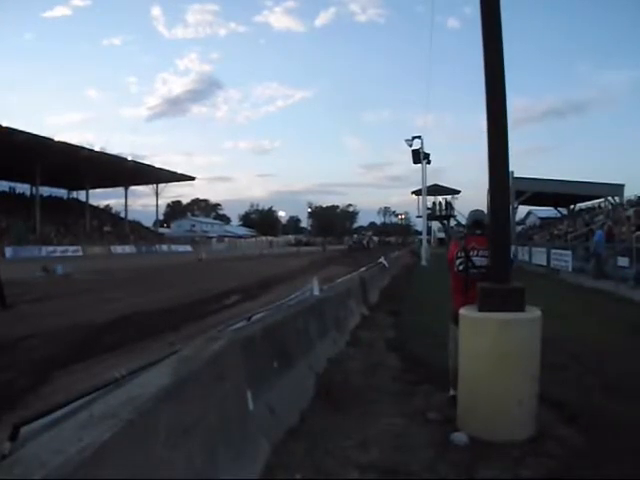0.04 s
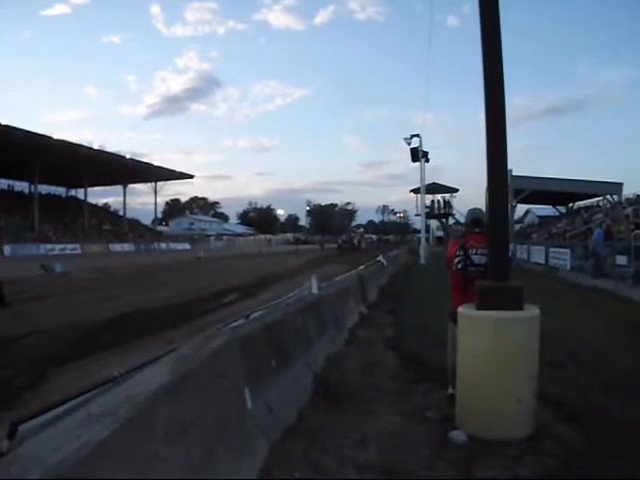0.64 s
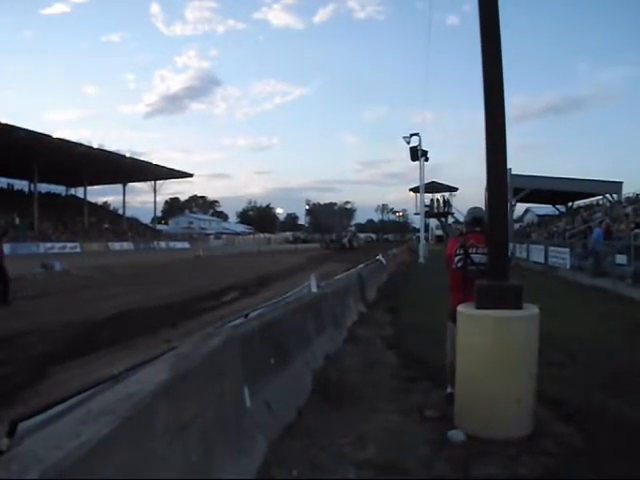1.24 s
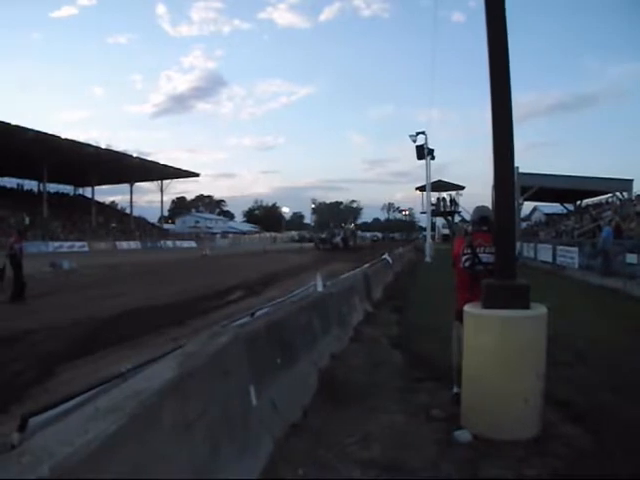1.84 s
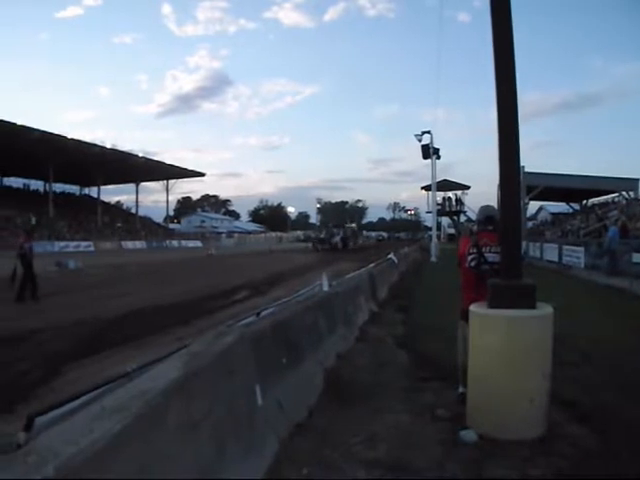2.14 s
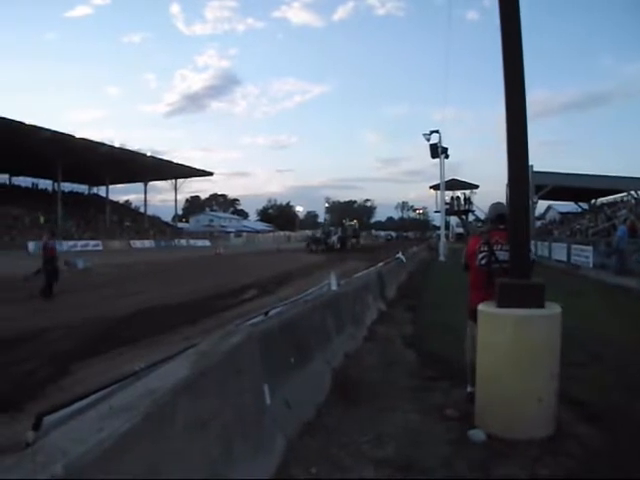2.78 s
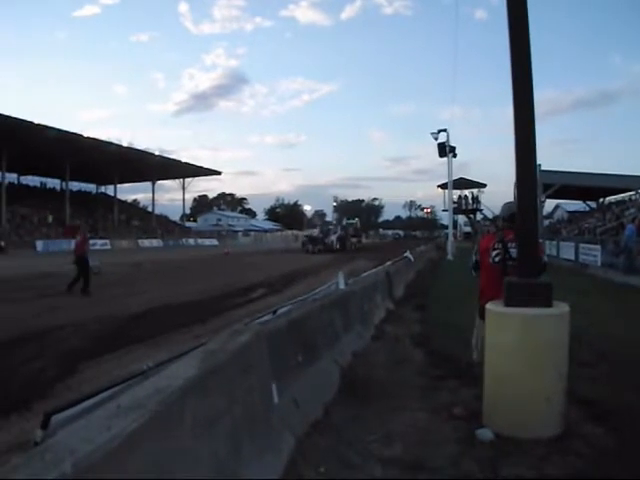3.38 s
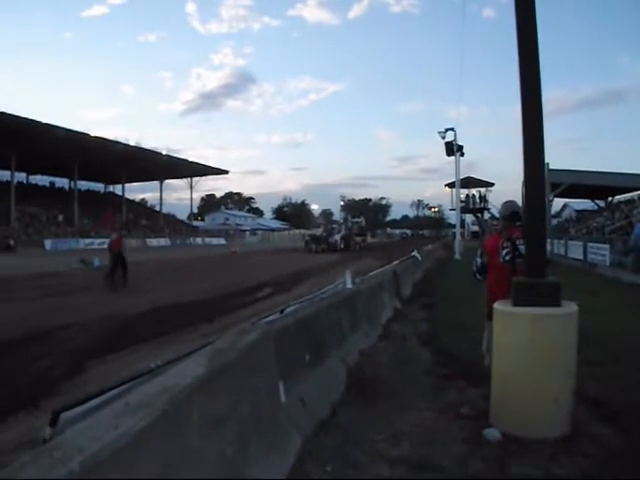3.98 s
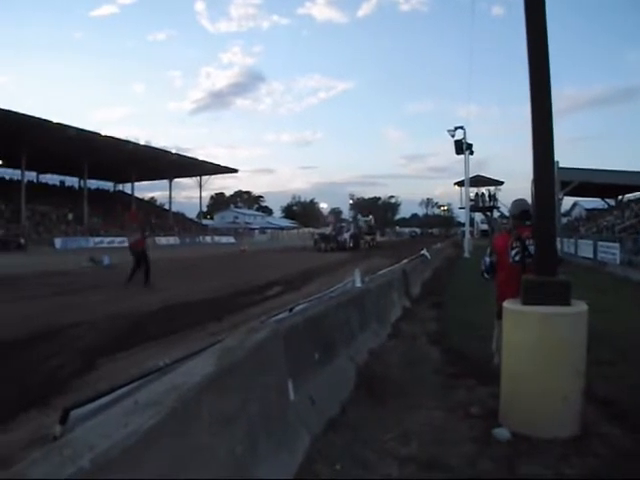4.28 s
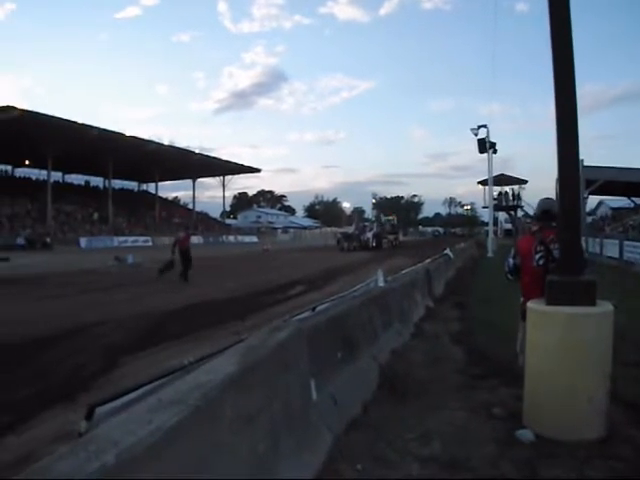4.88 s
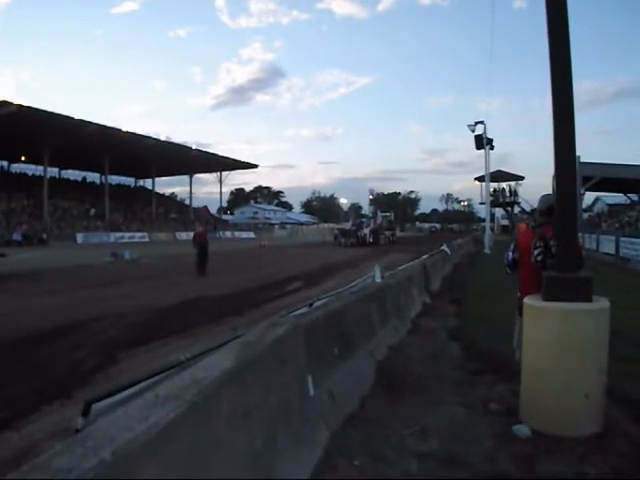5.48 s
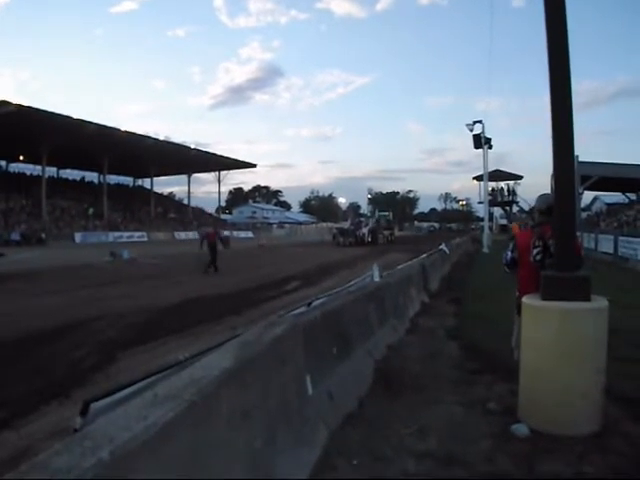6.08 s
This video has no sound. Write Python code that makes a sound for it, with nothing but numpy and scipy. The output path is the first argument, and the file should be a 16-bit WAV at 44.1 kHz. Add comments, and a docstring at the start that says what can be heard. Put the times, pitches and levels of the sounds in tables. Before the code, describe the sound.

Two quick exhaust blasts lead into the tearing, full-throttle roar of a multi-engine pulling tractor, overloading a small trackside microphone. After about a second and a half the throttle shuts and the revs sink. The engines settle into a lumpy, rasping idle with booming thuds and barks, while two brief falling whines and a few backfire pops come through. A grandstand returns a faint echo.

```python
"""Two blasts of exhaust, then the full-throttle roar of a pulling tractor's open-piped V8 engines,
heard from trackside on a small camera microphone that overloads. The throttle shuts, the blowers
whine down and three engines fall to a lumpy, barking idle, each firing a thud and a rasp in its pipe.
Unburnt fuel pops a few times. A wall returns the thuds; the grandstand answers from across the track."""
import sys
import numpy as np
from scipy import signal
from scipy.fft import rfft, irfft
from scipy.io import wavfile
from scipy.ndimage import uniform_filter1d, map_coordinates

SR = 44100
rng = np.random.default_rng(int(sys.argv[2]) if len(sys.argv) > 2 else 0)


def output_pcm(signal):
    """Save a mono or channel-first signal as 16-bit PCM at the path in sys.argv[1].

    Samples are clipped to [-1, 1] before scaling.
    """
    pcm = np.clip(np.atleast_2d(signal).T, -1, 1) * 32767
    wavfile.write(sys.argv[1], SR, np.round(pcm).astype(np.int16))


N = 274743
TIME = np.arange(N) / SR
SHUT_S, RELEASE_S = 1.405, 0.13  # the throttle shuts; time constant of the roar's decay

# spectrum of the gas puffing from a pipe: frequency_hz, relative_db
RASP_SPECTRUM = [(150, -2.5), (330, -9), (490, -6.5), (630, -8), (840, -8), (1010, -15.5), (1800, -19),
                 (2330, -13), (2600, -3), (3020, 1), (3450, -5.5), (3900, -5.5), (4400, -13), (5100, -24),
                 (5550, -64), (7000, -120)]
# resonances of a pipe struck by one firing: frequency_hz, relative_db
PIPE_SPECTRUM = [(18, -34), (42, -7), (55, 8), (70, -1), (88, 9), (108, -2), (135, -2), (150, 2.5),
                 (190, 2), (243, -5), (285, -19.5), (490, -16.5), (800, -22), (2000, -61), (6000, -120)]


def full_throttle(cycle_hz):
    """Exhaust orders sound under a tearing roar that pulses with the firings and buffets the microphone."""
    # blasts of exhaust: start_s, end_s, roar_rise_db
    blasts = [(0.017, 0.071, 7), (0.096, .146, 10.5)]
    # surges and lulls: peak_s, half_length_s, roar_rise_db, third_order_rise_db, buffet_rise_db
    surges = [(.048, 0.035, 3.5, 20.5, 19.5), (.085, 0.0092, -3, -12, -3), (.17, 0.025, 1.5, 7.5, 10),
              (.33, 0.052, 1.6, 14.5, 16), (.49, 0.063, 2, 8.5, 21), (.567, 0.0027, 4, 8, 7),
              (.696, .004, 3.5, 1, 10), (.78, .08, 1, 3, 12), (1.04, 0.13, 1.54, 7, 15.5),
              (1.27, 0.084, 2, 0, 15), (1.41, 0.065, 2.7, 15, 15)]
    # the booming fifth exhaust order: time_s, relative_db
    fifth_order = [(0, -12.5), (.1, -24), (.22, -17.5), (.52, -11), (.66, -28), (.8, -15), (1.21, -15),
                   (1.3, -40), (1.41, -13.5)]
    # upper exhaust orders: multiple_of_cycle_rate, relative_db
    upper_orders = [(6, -32.5), (7, -27.5), (8, -16.5), (11, -24), (13, -19), (15, -20.5), (16, -18),
                    (17, -40), (19, -32), (24, -27.5)]
    # the exhaust jet under load: frequency_hz, relative_db
    roar_spectrum = [(30, -15.5), (130, -9.5), (350, -12.5), (540, -10.5), (800, -15.5), (1300, -15.5),
                     (1950, -12.5), (2500, -5), (3000, 0.5), (3350, -1), (3650, -5), (4150, -8),
                     (4900, -19.5), (5600, -55)]
    # buffeting at the microphone: frequency_hz, relative_db
    buffet_spectrum = [(8, -5.5), (20, 3), (40, 6), (70, 4), (130, -19.5), (400, -49.5), (1500, -100)]
    roar_db, third_db, buffet_db = swells(surges) + [[-9.5], [-27.5], [-36.5]]  # over their base levels
    fifth_db = curve(fifth_order)
    blast_db = sum(db * ((TIME > start) & (TIME < end)) for start, end, db in blasts)
    phase = 2 * np.pi * np.cumsum(cycle_hz) / SR

    def order(multiple, jitter):
        return np.sqrt(2) * np.sin(multiple * phase + 2 * np.pi * rng.random() + jitter * wobble(12))

    low = amp(third_db) * order(3, jitter=0.9) + amp(fifth_db) * order(5, jitter=0.067)
    # the engines drift in and out of step, so each order swells and fades
    upper = sum(amp(db) * (1 + 0.62 * wobble(5.34)) * order(k, jitter=0.71) for k, db in upper_orders)
    tones = amp(0.51 * blast_db) * (low + amp(roar_db) * upper)
    pulses = firings(cycle_hz, drift=0.0014, scatter_db=4.0, far_bank=.6)
    gas = unit(puffs(pulses, life_s=0.0023)) + 0.96
    roar = amp(roar_db + blast_db + 1.64) * steady(hiss(roar_spectrum, gas), span_s=0.016)
    buffet = amp(buffet_db + blast_db) * hiss(buffet_spectrum)
    # orders and buffeting stop first when the throttle shuts
    return dying(SHUT_S, RELEASE_S) * roar + dying(SHUT_S, life_s=0.08) * (tones + buffet)


def firings(cycle_hz, drift, scatter_db, far_bank):
    """One V8 fires eight pulses a cycle, weaker from the bank facing away from the microphone."""
    # firing order: 1 for the near bank, 0 for the far bank
    banks = [1, 0, 1, 1, 0, 1, 0, 0]
    cycles = np.cumsum(cycle_hz * (1 + drift * wobble(6))) / SR + rng.random()
    slot = np.floor(8 * cycles).astype(int)
    onsets = np.flatnonzero(np.diff(slot)) + 1
    strength = np.where(np.take(banks, slot[onsets], mode="wrap"), 1, far_bank)
    scatter = amp(scatter_db * rng.standard_normal(4096)[:len(onsets)].clip(-2, 2))
    return np.bincount(onsets, strength * scatter, N)


def idle(cycle_hz):
    """The engines lope out of step; every uneven firing is a thud in its pipe and a rasping puff."""
    # idling engines: speed_ratio, relative_db, pipe_tuning_ratio
    engines = [(1, -0.5, 1.031), (1.05, -2, 1.034), (.955, -4, 0.937)]
    # flares of harder firing: peak_s, thud_rise_db, rasp_rise_db
    flares = [(1.96, 1, 3), (2.42, -2.5, 2.5), (2.6, 3, 3), (2.77, 6.5, 1.5), (2.96, 4.5, 0.5),
              (3.42, 3.5, 5), (4.18, 7, 4), (4.58, 0, 1), (4.97, 1, 0.5), (5.12, 2.5, 2.5), (5.28, 0, 2.5),
              (5.77, 0, 1), (5.938, 1.5, 2), (6.12, 4, 0.5)]
    catch_s, catch_rise_s = 1.78, .04  # the starved engines catch again
    flare_half_s, rasp_rise_db_per_s = 0.038, 0.3
    wall_delay_s, wall_gain = .0265, 0.45
    starved = 1 - np.clip((TIME - catch_s) / catch_rise_s, 0, 1)
    flare_thud_db, flare_rasp_db = swells([(s, flare_half_s, *rises) for s, *rises in flares])
    thud_db = -20 - 10 * starved + flare_thud_db + 1.27 * wobble(13)
    settling_db = rasp_rise_db_per_s * (TIME - catch_s)  # the rasp hardens as the idle settles
    rasp_db = -18.5 + settling_db - 1.5 * starved + flare_rasp_db + 0.6 * wobble(8.3)
    thud, all_pulses = 0, 0
    for speed_ratio, db, tuning in engines:
        strength = amp(db + 1.05 * wobble(6))
        pulses = strength * firings(cycle_hz * speed_ratio, drift=.055, scatter_db=3.5, far_bank=0.21)
        pipe = [(hz * tuning, level) for hz, level in PIPE_SPECTRUM]
        mean_flow = uniform_filter1d(pulses, size=4410)
        thud = thud + coloured(mean_flow - pulses, pipe)
        all_pulses = all_pulses + pulses
    wall_echo = wall_gain * np.interp(TIME - wall_delay_s, TIME, thud)
    thud = steady(thud + wall_echo, span_s=0.0615)
    gas = unit(puffs(all_pulses, life_s=0.0047)) + 0.51
    rasp = steady(hiss(RASP_SPECTRUM, gas), span_s=0.1)
    return (1 - dying(SHUT_S, RELEASE_S)) * (amp(thud_db) * thud + amp(rasp_db) * rasp)


def chugs():
    """A few strong firings in a row make a pipe boom at its own pitch, swelling and fading quickly."""
    # booms of a pipe: start_s, length_s, level_db, pitch_hz
    booms = [(1.6, 0.085, -22.5, 101), (1.808, 0.058, -15, 104.2), (1.882, 0.072, -20, 98.2),
             (1.96, 0.05, -18.5, 129), (2.407, 0.044, -13.5, 108.9), (2.48, 0.031, -23, 111.6),
             (2.726, 0.041, -15.5, 119), (2.939, 0.048, -18, 112.1), (3.017, 0.044, -16.5, 104),
             (3.183, 0.027, -16, 111), (3.47, 0.056, -19, 111.5), (3.61, 0.061, -14.5, 108.7),
             (3.777, 0.045, -17, 109.9), (3.913, 0.053, -16, 106.3), (4.216, 0.073, -16.5, 108),
             (4.534, 0.072, -19, 105.2), (5.533, 0.031, -20, 119.9), (5.621, 0.041, -17, 111),
             (5.901, 0.13, -18.5, 114.9)]
    tone = lambda hz: np.sqrt(2) * np.sin(2 * np.pi * (hz * TIME + rng.random()))
    return sum(amp(db) * bell(s + length / 2, 0.7 * length) * tone(hz) for s, length, db, hz in booms)


def barks():
    """Now and then a cylinder fires much harder: one thud and one puff of gas."""
    # hard single firings: start_s, relative_db
    hard_firings = [(1.9725, -4.5), (2.1389, -10.5), (2.3944, -12), (3.419, -15), (4.5486, -5),
                    (4.6849, -18), (4.752, -6.5), (4.9242, -5.5), (4.9927, -5.5), (5.1357, -8.5),
                    (5.3187, -8), (5.6537, -10), (5.734, -4.5)]
    start_s, db = np.transpose(hard_firings)
    pulses = np.bincount(np.round(start_s * SR).astype(int), amp(db), N)
    gas = puffs(pulses, life_s=.003)
    rasp = gas.std() * hiss(RASP_SPECTRUM, gas)
    return amp(-1.5) * rasp - amp(16.5) * coloured(pulses, PIPE_SPECTRUM)


def pops():
    """Unburnt fuel goes off in a pipe: one swing of air with a bang and a crack on its crest."""
    # pops in the pipes: peak_s, push_db, bang_db, crack_db, half_length_s
    backfires = [(2.43, -2.5, -3.5, -2, 0.0012), (2.526, -9, -35, -25, 0.00054),
                 (2.825, -24, -18, -11.5, 0.0011), (4.625, -6, -12, -5.5, 0.00074)]
    # the dull part of a pop: frequency_hz, relative_db
    bang_spectrum = [(300, -33), (850, 0), (1900, -8), (2500, -7), (5000, -49)]
    # the bright part: frequency_hz, relative_db
    crack_spectrum = [(500, -11), (3000, 13), (12000, 9)]
    push = lambda s: bell(s, 0.0054) * np.cos(2 * np.pi * 115 * (TIME - s))
    bang = steady(hiss(bang_spectrum), span_s=0.0015)
    crack = steady(hiss(crack_spectrum), span_s=0.00064)
    return sum(amp(push_db) * push(s) + bell(s, half_s) * (amp(bang_db) * bang + amp(crack_db) * crack)
               for s, push_db, bang_db, crack_db, half_s in backfires)


def blowers():
    """Fuzzy whines swell and sink in pitch as the rotors slow."""
    # blowers running down: peak_s, half_length_s, pitch_at_peak_hz, level_db
    whines = [(2.22, 0.2, 3180, -20), (2.82, 0.13, 3087, -21.5)]
    fuzz_hz, sink_per_s = 480, .56  # width of a whine; relative fall of its pitch
    fuzz = wobble(fuzz_hz) + 1j * wobble(fuzz_hz)
    sound = 0
    for peak_s, half_s, hz, db in whines:
        phase = 2 * np.pi * np.cumsum(hz * np.exp(-sink_per_s * (TIME - peak_s))) / SR
        sound = sound + amp(db) * bell(peak_s, half_s) * unit(np.real(fuzz * np.exp(1j * phase)))
    return sound


def grandstand(x):
    """The stand across the track sends back a diffuse answer, the treble dying first."""
    # reverberation time of the stand: frequency_hz, t60_s
    decay_times = [(100, 0.67), (1000, 0.88), (5000, 0.2)]
    hz, t, noise = signal.stft(rng.standard_normal(SR // 2), SR, nperseg=256)
    decay = amp(-60 * t / along(decay_times, hz)[:, None])
    tail = signal.istft(noise * decay, SR, nperseg=256)[1]
    response = np.pad(tail / np.linalg.norm(tail), (int(.025 * SR), 0))  # arrives 25 ms late
    return signal.fftconvolve(x, response)[:N]


def amp(db):
    """Decibels to gain."""
    return 10 ** (np.asarray(db) / 20)


def unit(x):
    """Scale to rms 1."""
    return x / np.sqrt(np.mean(x ** 2) + 1e-20)


def running_rms(x, span_s):
    """Level averaged over a sliding span."""
    return np.sqrt(np.abs(uniform_filter1d(x ** 2, int(span_s * SR))) + 1e-9)


def steady(x, span_s):
    """Hold the running rms at 1."""
    return x / running_rms(x, span_s)


def along(points, hz):
    """Read (frequency_hz, value) points on a log axis."""
    knot_hz, values = np.transpose(points)
    return np.interp(np.log(hz + 1), np.log(knot_hz + 1), values)


def curve(points):
    """Join (time_s, value) points, one value a sample."""
    return np.interp(TIME, *np.transpose(points))


def wobble(rate):
    """A smooth random curve, rate knots a second."""
    steps = np.arange(0, rate * N / SR + 1, 1 / 4)
    spline = map_coordinates(rng.standard_normal(4096), [steps + 2], mode="wrap")
    return np.interp(TIME * rate, steps, spline)


def bell(peak_s, half_s):
    """A smooth swell that peaks at 1."""
    return np.exp(-np.minimum(((TIME - peak_s) / half_s) ** 2, 60))


def swells(rows):
    """Sum of swells (peak_s, half_length_s, heights...): one curve for each height column."""
    return sum(np.outer(heights, bell(s, half_s)) for s, half_s, *heights in rows)


def dying(start_s, life_s):
    """1 until the start, then an exponential decay."""
    return np.exp(-np.maximum(TIME - start_s, 0) / life_s)


def puffs(pulses, life_s):
    """Envelope of the gas let out by each pulse."""
    return np.sqrt(signal.lfilter([1], [1, -np.exp(-1 / (life_s * SR))], pulses ** 2))


def coloured(x, spectrum, size=8192):
    """Causal (minimum-phase) filter with the given spectrum."""
    gain = amp(along(spectrum, np.fft.rfftfreq(size, 1 / SR)))
    cepstrum = irfft(np.log(gain))
    cepstrum[1:size // 2] *= 2
    cepstrum[size // 2 + 1:] = 0
    return signal.oaconvolve(x, irfft(np.exp(rfft(cepstrum))))[:N]


def hiss(spectrum, gate=1):
    """Gated noise through a spectrum, rms 1."""
    return unit(coloured(gate * rng.standard_normal(N), spectrum))


def lowpass(x, edge_hz):
    """Steep low-pass without delay."""
    return signal.oaconvolve(x, signal.firwin(201, edge_hz, fs=SR), "same")


def scene():
    """At trackside: the throttle shuts, the roar dies and the revs sink to idle."""
    # engine speed under load: time_s, four_stroke_cycle_hz
    loaded_speed = [(0, 40.7), (.13, 45.5), (.19, 34.6), (.33, 35.1), (.45, 33.4), (.8, 34.5), (1.0, 34.7),
                    (1.2, 34.1), (1.42, 34.2)]
    idle_hz, coast_start_s, run_down_s = 13.8, 1.55, .24
    cycle_hz = idle_hz + (curve(loaded_speed) - idle_hz) * dying(coast_start_s, run_down_s)
    tractor = full_throttle(cycle_hz) + idle(cycle_hz) + chugs() + barks() + blowers()
    return (tractor + amp(-15.5) * grandstand(tractor) + pops())[None]


def record(dry):
    """The camera's input squashes crests and breaks the highest into crackle; faint hiss, a band limit."""
    overload_db, hiss_db, top_hz = -5, -51.0, 12400
    x = dry[0]
    overload = np.minimum(running_rms(x, span_s=.022) / amp(overload_db), 2)
    # heavy overload leaves sharp corners, light overload is rounded off a little sooner
    sharp = np.minimum(overload ** 6, 1)
    rail = .72 + .22 * np.minimum(overload, 1)
    excess = x - np.clip(x, -rail, rail)
    squashed = x - sharp * excess - (1 - sharp) * lowpass(excess, 4250)
    # above a ceiling that sags with the overload, some samples flip towards the other rail
    ceiling = .95 + .4 / overload ** 3
    flips = np.sign(x) * (np.abs(x) > ceiling) * (rng.random(N) < .38)
    crackle = -2.05 * signal.lfilter([.7], [1, -.3], flips)
    return lowpass(squashed + crackle + amp(hiss_db) * rng.standard_normal(N), top_hz)[None]


dry = scene()
out = record(dry)
output_pcm(out)
```